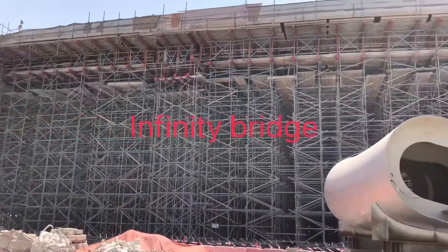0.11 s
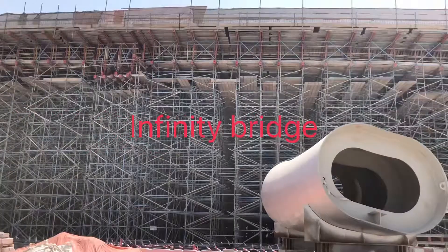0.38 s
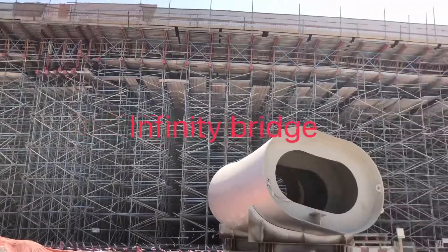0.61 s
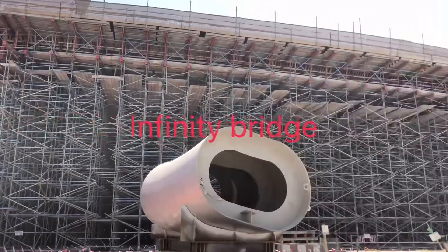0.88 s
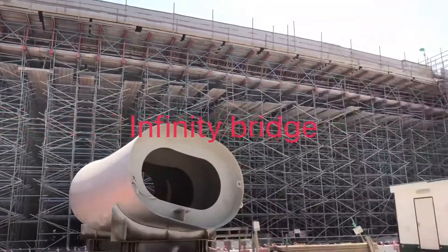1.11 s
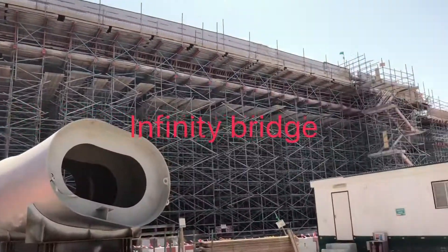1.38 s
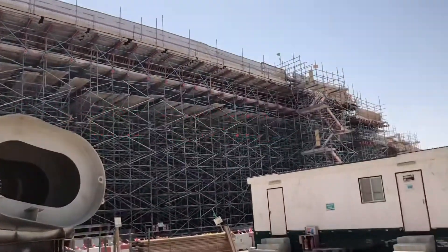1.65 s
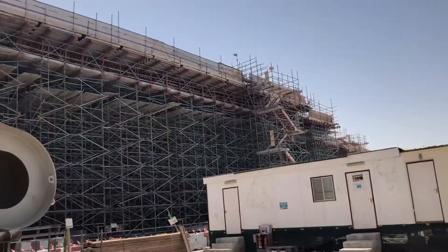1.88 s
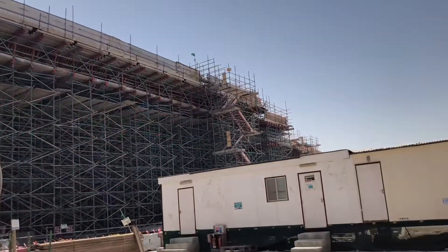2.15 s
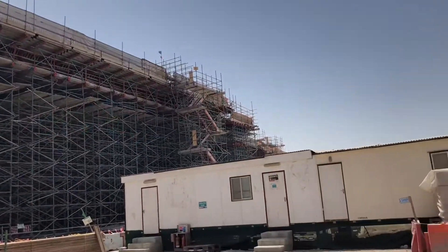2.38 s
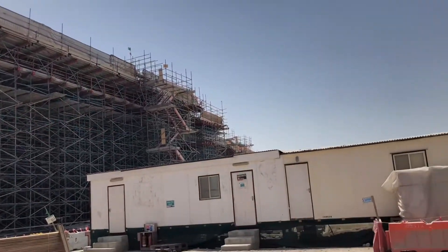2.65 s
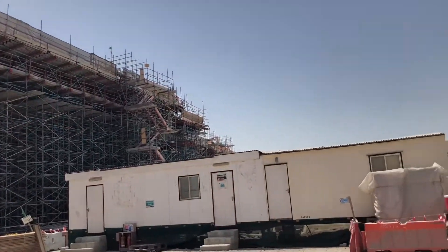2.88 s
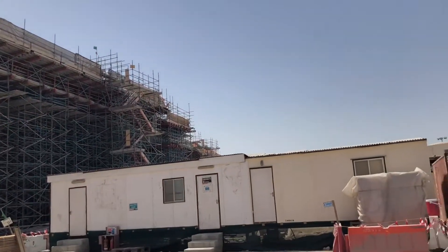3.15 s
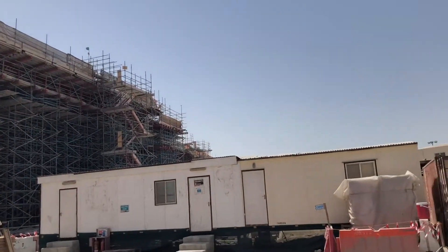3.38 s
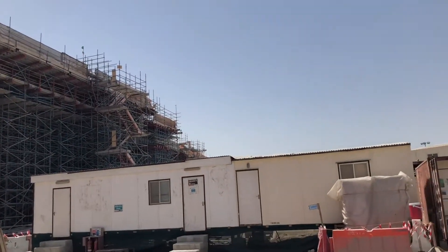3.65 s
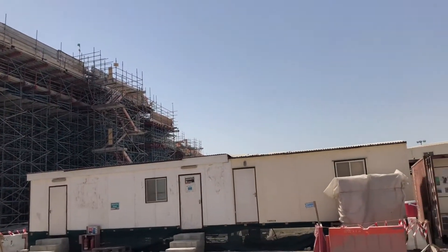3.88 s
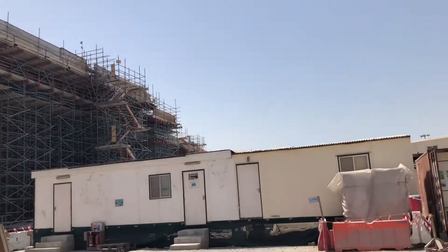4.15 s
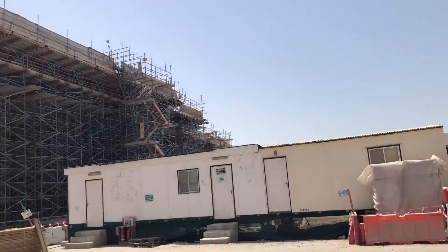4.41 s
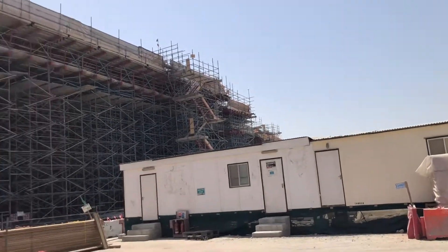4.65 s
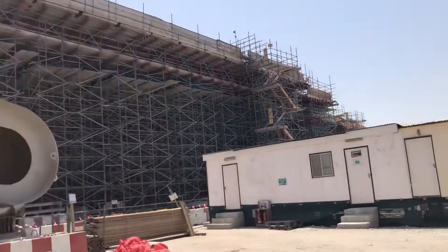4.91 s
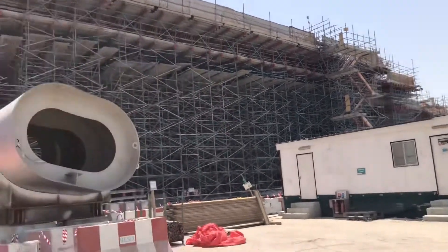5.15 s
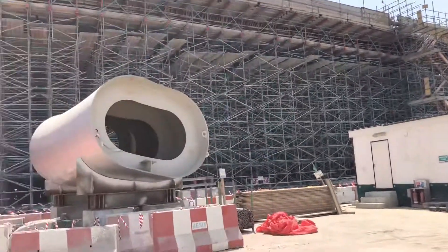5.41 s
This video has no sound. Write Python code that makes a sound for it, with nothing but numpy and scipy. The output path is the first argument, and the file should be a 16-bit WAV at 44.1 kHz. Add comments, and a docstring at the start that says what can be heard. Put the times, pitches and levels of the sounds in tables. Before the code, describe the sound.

A big diesel engine drones low and steady on an open building site, with airy fan roar and intermittent thin metallic rasping.

```python
"""A large six-cylinder diesel idles steadily on an open building site: exhaust partials locked to its cycle. A
smaller engine hums behind it on two partials and throbs against the diesel. Fan and casing roar, shaped noise
with wavering hums, fills the air; it is strongest at first, dips, and rises again near the end. Another machine
draws away with a sinking whine of two unsteady tones. A thin metallic rasp comes and goes in the treble: dense
clicks ringing a few short modes."""
import sys
import numpy as np
from scipy import signal
from scipy.fft import rfft, irfft, next_fast_len
from scipy.io import wavfile

SR = 44100
rng = np.random.default_rng(int(sys.argv[2]) if len(sys.argv) > 2 else 0)


def persist_wave(psi):
    """Save psi, clipped to +-1, as 16-bit WAV."""
    counts = np.round(np.clip(psi, -1, 1) * 32767).astype(np.int16)
    wavfile.write(sys.argv[1], SR, np.atleast_2d(counts).T)


def linear_from_db(decibels):
    """Turn decibels (scalar or array-like) into linear amplitude factors; 0 gives 1."""
    return 10 ** (np.asarray(decibels, float) / 20)


N = 243873

# broad air noise over time: start_s, roar_level_db, hiss_level_db
AIR_LEVELS = [(0, -24.5, -37), (.45, -25.5, -38), (1.1, -29, -41), (1.7, -30, -42.5), (2.5, -30.5, -43.5),
              (2.9, -30.5, -42), (4.3, -30, -41.5), (5.0, -29.5, -42), (5.53, -29, -40.5)]
# spectra of the four air layers, only their shape counts: frequency_hz, level_db (per Hz)
RUMBLE_SPECTRUM = [(15, -26), (35, -24), (45, -19), (60, -11), (85, -3), (105, 1), (120, 1.5), (135, 1),
                   (180, -4), (240, -2), (300, -13.5), (400, -32)]
ROAR_SPECTRUM = [(180, -20), (250, -1), (350, -2), (500, -6), (680, -7), (900, -9), (1200, -8.5),
                 (1700, -11.5), (2300, -16.5), (3000, -21.5), (4200, -25.5)]
HISS_SPECTRUM = [(2000, -22), (3000, -2.5), (4200, -2), (5000, -4), (6500, -5.5), (8000, -11), (11000, -23)]
TOP_HISS_SPECTRUM = [(6000, -7), (8500, -1), (10000, -3), (12000, -4.5), (14000, -10), (15700, -9)]
# rumble and top hiss: mean level in dB, and share of the swing of roar and hiss that they follow
RUMBLE_DB, RUMBLE_FOLLOWS, TOP_DB, TOP_FOLLOWS = -29, 0.63, -50, 1.36
# faint hums that swell with the roar: pitch_hz, width_hz (of each of two passes), level_db (against the roar)
HUM_BANDS = [(199.6, 2.3, -12.5), (336.2, 1.5, -14.5), (420.7, 2.8, -19), (466, 9.2, -19.5),
             (538, 4.5, -30), (558, 2.4, -16), (600.5, 4.4, -20.5), (669.3, 10.6, -16), (685, 4.2, -17.5),
             (787, 6.2, -23), (1019, 4, -20), (1055, 9.5, -20.5), (1133, 5.6, -20.5), (1146, 4.7, -19.5),
             (1266, 13, -22)]

# lower tone of the whine: sinks along an S-curve between two pitches, then dies out
LOW_FROM_HZ, LOW_TO_HZ, SINK_MID_S, SINK_TAKES_S = 312, 267.7, 0.88, 0.28
LOW_DB, LOW_DIES_S = -44.5, 1.6
# upper tone of the whine: holds its mean pitch, then dies out
HIGH_HZ, HIGH_DB, HIGH_DIES_S = 424, -37.5, 1.1
DYING_DB_PER_S = 36
# brief swells of the lower tone: centre_s, level_db
LOW_SWELLS = [(.42, -25.5), (.79, -30.5)]
SWELL_S = 0.054   # spread of each swell

# smaller engine: multiple of its firing rate, level_db (rms)
SMALL_PARTIALS = [(1, -32), (2, -33.5)]
SMALL_HZ = 49.72   # mean firings per second
# the diesel's fourth cycle partial beats with the small engine: rms level, a moment when they oppose
FOURTH_DB, OPPOSED_S = -40, 2.78

# strokes of the rasp: start_s, length_s, level_db (at the end of the stroke)
RASP_STROKES = [(0, .585, -38), (.68, 0.27, -46), (1.24, 0.099, -44), (1.45, .65, -49), (2.66, .66, -44),
                (4.1, 0.45, -49), (5.137, .27, -43)]
# onset of a stroke, its rise in level along its length, decay time after it, floor between strokes
BITE_S, GROWS_DB, STOP_S, IDLE_DB = .06, 3, .012, -53
# modes the rasp rings with: pitch_hz, width_hz (of each of two passes), level_db
LOWER_RASP_MODES = [(3356, 43, -9.5), (3585, 30, -7.5), (3677, 83, -6), (3734, 117, -3)]
UPPER_RASP_MODES = [(1856, 66, -2.5), (4970, 260, -8.5), (8580, 500, -12.5)]
# upper modes ring more under a hard stroke: dB against the lower at a -40 dB stroke, dB gained per dB
UPPER_DB, UPPER_PER_DB = -3, 1.7

# speed of the big diesel: start_s, firing_hz
FIRING_RATE = [(0, 72.02), (2.6, 72.0), (4.4, 72.08), (5.53, 72.2)]
CYLINDERS = 6   # firings in one whole cycle
# exhaust partials: multiple of the firing rate, level_db (rms; the third also swells)
EXHAUST_PARTIALS = [(1, -17.5), (2, -24.5), (3, -33.5), (4, -42.5)]
# slow swell added to the third exhaust partial: start_s, change_db
THIRD_SWELL = [(0, 1), (.45, -4), (1.0, 4.5), (2.6, 3.5), (2.9, -1.5), (4.4, -8.5), (5.53, 4.5)]
PULSE_SKEW = 1.44   # radians by which a partial leads, per e-fold in pitch
# partials added by unlike cylinders: multiple of the whole cycle, level_db (rms)
UNEVEN_PARTIALS = [(5, -47.5), (10, -40), (11, -48.5), (13, -41.5), (14, -40.5), (16, -45), (17, -39.5),
                   (20, -37.5), (21, -41), (22, -41.5)]


def in_time(rows):
    """Columns of a curve, one value per sample."""
    s, *columns = np.transpose(rows)
    return [np.interp(np.arange(N) / SR, s, c) for c in columns]


def rms_one(x):
    """Scale to unit rms."""
    return x / np.sqrt(np.mean(x ** 2) + 1e-20)


def drift(rate_hz):
    """Slow random wander of unit spread: noise through two equal low-pass poles."""
    # made at one point per 40 samples, its first 2000 points dropped to let the filter settle
    r = np.exp(-80 * np.pi * rate_hz / SR)
    slow = signal.lfilter([1], [1, -2 * r, r * r], rng.standard_normal(N // 40 + 2002))[2000:]
    slow = rms_one(slow - slow.mean())
    return np.interp(np.arange(N) / 40, np.arange(len(slow)), slow)


def coloured(spectrum):
    """Noise of unit rms shaped by a spectrum, interpolated over log frequency."""
    size = next_fast_len(N)
    hz, db = np.transpose(spectrum)
    bins_hz = np.maximum(np.arange(size // 2 + 1) * SR / size, 1)
    shape = linear_from_db(np.interp(np.log(bins_hz), np.log(hz), db, left=-80, right=-80))
    white = rng.standard_normal(size)
    return rms_one(irfft(rfft(white) * shape, size)[:N])


def resonance(x, hz, width_hz):
    """Two-pole resonance with gain 1 on top."""
    r = np.exp(-np.pi * width_hz / SR)
    poles = [1, -2 * r * np.cos(2 * np.pi * hz / SR), r * r]
    return signal.lfilter([(1 - r * r) / 2, 0, (r * r - 1) / 2], poles, x)


def tone(phase, db):
    """A sine of the given rms level."""
    return np.sqrt(2) * linear_from_db(db) * np.cos(phase)


def hums(roar_db):
    """Narrow bands of noise: tones that waver in strength and follow the roar."""
    white = rng.standard_normal(N + SR)
    bands = np.zeros(N)
    for hz, width_hz, db in HUM_BANDS:
        ringing = resonance(resonance(white, hz, width_hz), hz, width_hz)
        bands += linear_from_db(db) * rms_one(ringing[SR:])   # the first second lets the ringing build up
    return linear_from_db(roar_db) * bands


def air():
    """Shaped noise: steady-grained rumble, roar with its hums, and two hisses; all but the rumble flutter."""
    roar_db, hiss_db = in_time(AIR_LEVELS)
    rumble_db = RUMBLE_DB + RUMBLE_FOLLOWS * (roar_db - roar_db.mean())
    top_db = TOP_DB + TOP_FOLLOWS * (hiss_db - hiss_db.mean())
    rumble = linear_from_db(rumble_db) * coloured(RUMBLE_SPECTRUM)
    roar = linear_from_db(roar_db + 0.4 * drift(15)) * coloured(ROAR_SPECTRUM)
    hiss = linear_from_db(hiss_db + 0.6 * drift(15)) * coloured(HISS_SPECTRUM)
    top_hiss = linear_from_db(top_db + 0.5 * drift(8.7)) * coloured(TOP_HISS_SPECTRUM)
    return rumble + roar + hums(roar_db) + hiss + top_hiss


def whine():
    """Two tones unsteady in pitch and level fade out; the lower one sinks as it goes."""
    t = np.arange(N) / SR
    sink = 1 / (1 + np.exp((t - SINK_MID_S) / SINK_TAKES_S))
    low_hz = LOW_TO_HZ + (LOW_FROM_HZ - LOW_TO_HZ) * sink
    low_gain = linear_from_db(LOW_DB - DYING_DB_PER_S * np.maximum(t - LOW_DIES_S, 0))
    for centre_s, db in LOW_SWELLS:
        low_gain = low_gain + linear_from_db(db) * np.exp(-.5 * ((t - centre_s) / SWELL_S) ** 2)
    high_gain = linear_from_db(HIGH_DB - DYING_DB_PER_S * np.maximum(t - HIGH_DIES_S, 0))
    out = np.zeros(N)
    for hz, gain in ((low_hz, low_gain), (HIGH_HZ, high_gain)):
        phase = 2 * np.pi * np.cumsum(hz + 3.44 * drift(5.5)) / SR
        out += gain * tone(phase, 2.7 * drift(5.9))
    return out


def diesel_cycle():
    """Phase of the big diesel's whole cycle in radians."""
    return 2 * np.pi * np.cumsum(in_time(FIRING_RATE)[0]) / SR / CYLINDERS


def small_engine():
    """A nearly steady firing hum; the diesel's nearby cycle partial makes it throb."""
    opposed = int(OPPOSED_S * SR)
    firing = 2 * np.pi * np.cumsum(SMALL_HZ + .02 * drift(.5)) / SR
    fourth = 4 * diesel_cycle()
    hum = np.zeros(N)
    for multiple, db in SMALL_PARTIALS:
        hum += tone(multiple * (firing - firing[opposed]), db + .5 * drift(1.6))
    return hum - tone(fourth - fourth[opposed], FOURTH_DB)


def strokes():
    """Level of the rasp in dB: each stroke bites in, grows and stops short; the strongest one wins."""
    t = np.arange(N) / SR
    gain = np.full(N, linear_from_db(IDLE_DB))
    for start_s, length_s, db in RASP_STROKES:
        since = t - start_s
        bite = np.clip(since / BITE_S, 0, 1) * np.exp(-np.maximum(since - length_s, 0) / STOP_S)
        growing_db = db - GROWS_DB * np.clip(1 - since / length_s, 0, 1)
        gain = np.maximum(gain, bite * linear_from_db(growing_db))
    return 20 * np.log10(gain)


def ring(clicks, modes):
    """Clicks set a bank of short metallic modes ringing."""
    out = np.zeros(N)
    for k, (hz, width_hz, db) in enumerate(modes):
        ringing = resonance(resonance(clicks + 1e-18, hz, width_hz), hz, width_hz)
        # neighbouring modes alternate in sign so that no hole opens between them
        out += (-1) ** k * linear_from_db(db) * rms_one(ringing)
    return out


def rasp():
    """Very dense clicks of uneven size and random sign ring two banks of modes."""
    level_db = strokes()
    upper_db = UPPER_DB + UPPER_PER_DB * (level_db + 40)
    struck = rng.random(N) < 4000 / SR   # about 4000 clicks per second
    size = linear_from_db(3.2 * np.minimum(rng.exponential(1, N), 5))
    clicks = struck * size * rng.choice([-1, 1], N)
    lower = ring(clicks, LOWER_RASP_MODES)
    upper = ring(clicks, UPPER_RASP_MODES)
    return linear_from_db(level_db + 1.0 * drift(22)) * (lower + linear_from_db(upper_db) * upper)


def diesel():
    """Skewed exhaust pulses, six to the cycle; unlike cylinders add partials of the whole cycle."""
    cycle = diesel_cycle()
    swell_db, = in_time(THIRD_SWELL)
    out = np.zeros(N)
    for multiple, db in EXHAUST_PARTIALS:
        phase = multiple * CYLINDERS * cycle + PULSE_SKEW * np.log(multiple)
        # higher partials waver more
        waver_db = (multiple - 1) * 0.66 * drift(1.7) + 0.26 * drift(1.2)
        out += tone(phase, db + (multiple == 3) * swell_db + waver_db)
    for multiple, db in UNEVEN_PARTIALS:
        out += tone(multiple * cycle + rng.uniform(0, 2 * np.pi), db + 1.8 * drift(0.53))
    return out


def scene():
    """All sources add up in one channel, without echoes, as in the open."""
    return (air() + whine() + small_engine() + rasp() + diesel())[None]


def low_pass(x):
    """Removes everything above the highest recorded frequency."""
    return signal.sosfilt(signal.butter(12, 15660, fs=SR, output="sos"), x)


def record(dry):
    """The finished mix goes out at its own level."""
    return low_pass(dry)


dry = scene()
out = record(dry)
persist_wave(out)
```